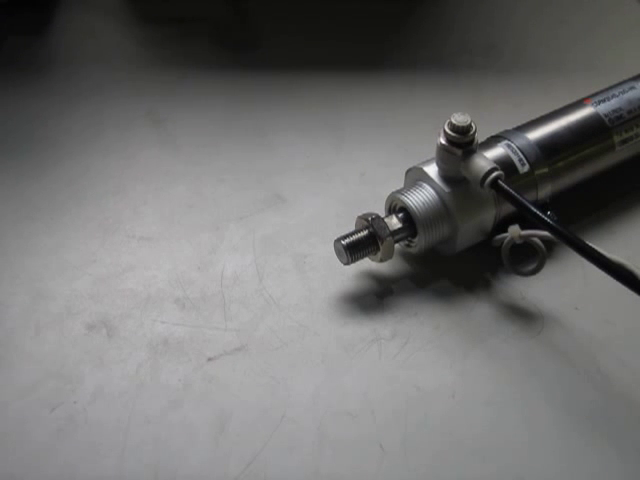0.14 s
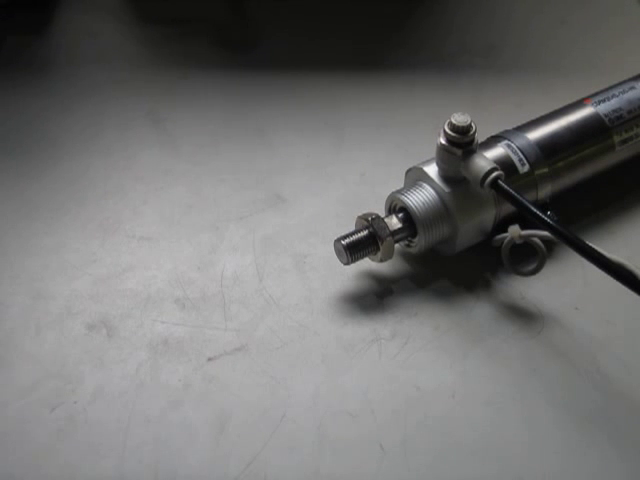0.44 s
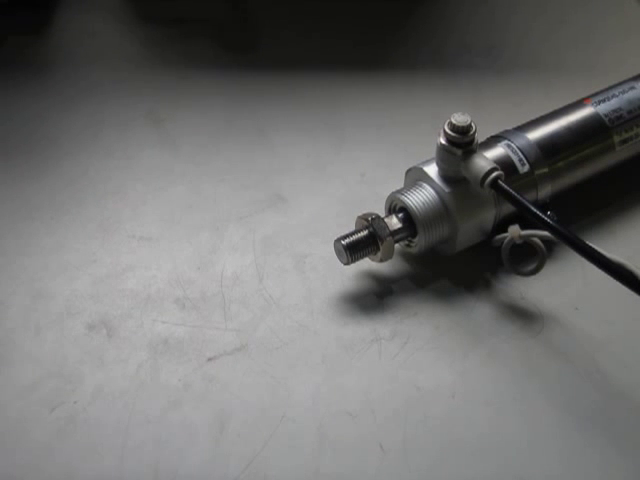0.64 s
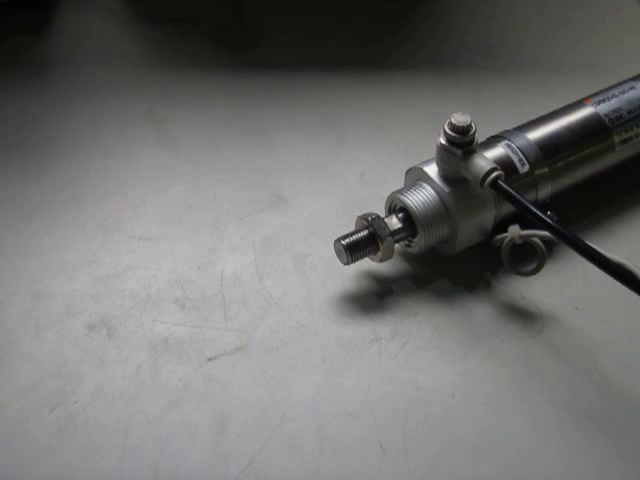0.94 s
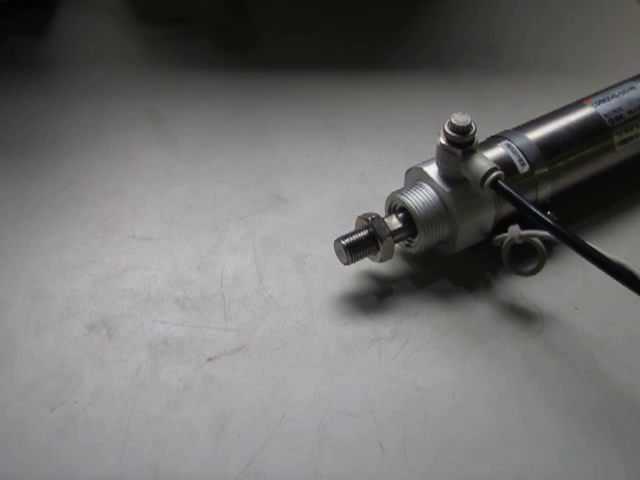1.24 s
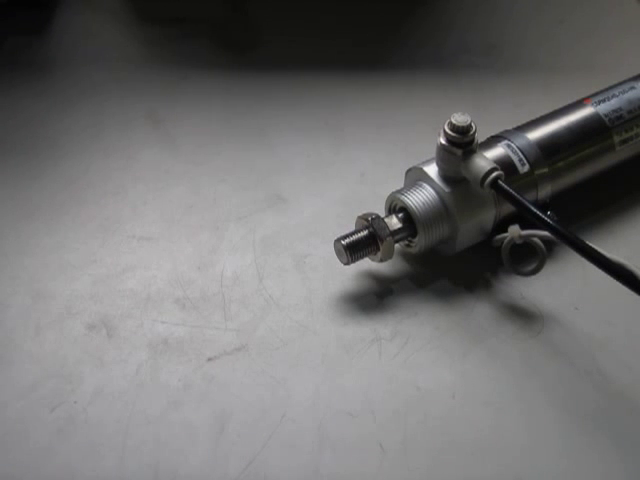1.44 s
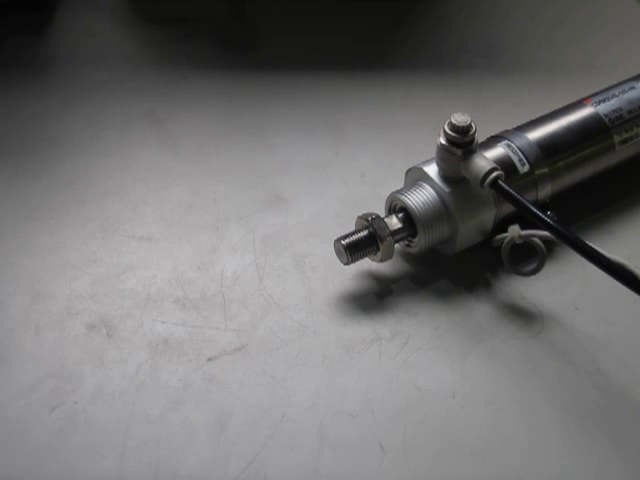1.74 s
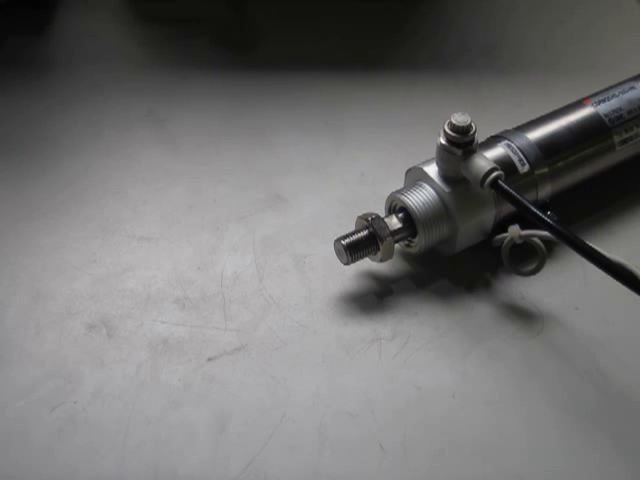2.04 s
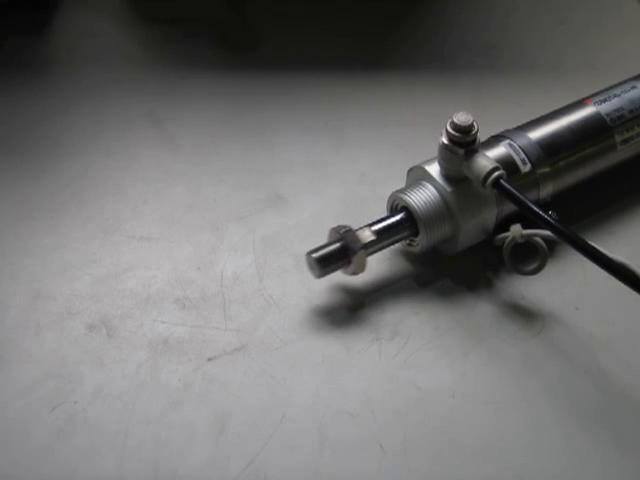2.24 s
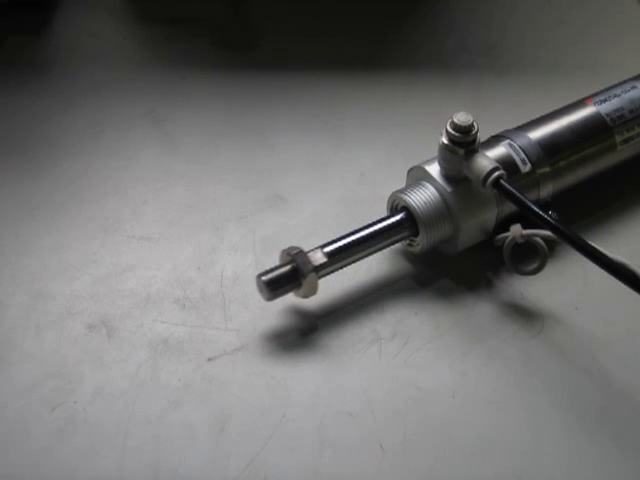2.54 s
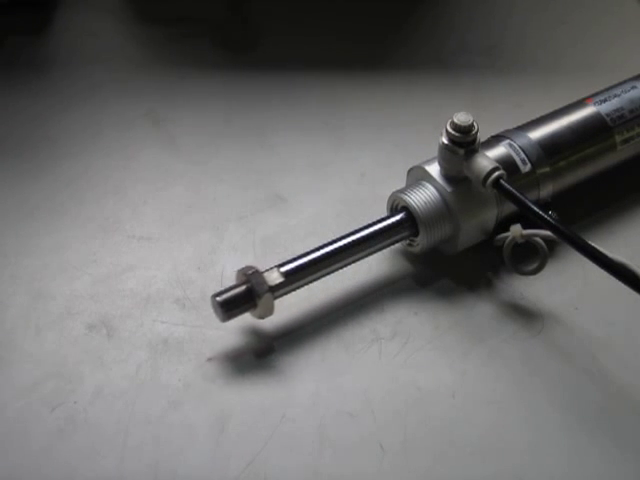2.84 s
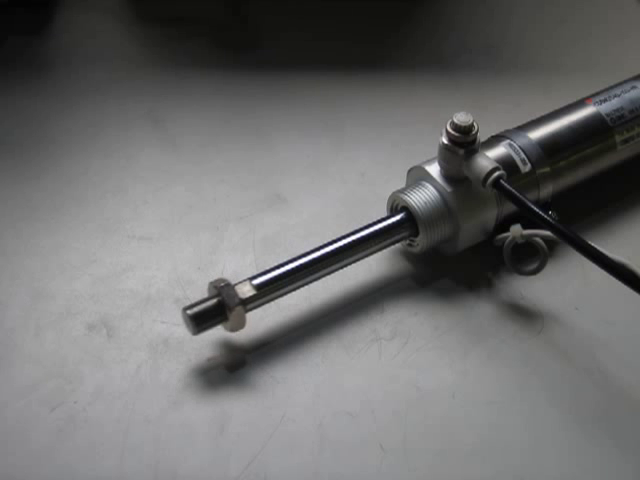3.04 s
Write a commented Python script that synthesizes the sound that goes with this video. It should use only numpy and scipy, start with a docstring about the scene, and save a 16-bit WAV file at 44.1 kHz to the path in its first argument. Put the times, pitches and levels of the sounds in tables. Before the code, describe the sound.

Pneumatic valve clicks and vents two sharp air puffs, then cylinder hiss over steady machine whir

```python
"""A steady machine whir over low hum, then a pneumatic cylinder on a bench goes to work.
The solenoid knocks and buzzes; the valve clicks over and vents in two sharp puffs.
The piston breaks loose with a low judder, and air hisses louder as the rod slides out.
Air and whir are noise shaped by broad colours and narrow resonances; hum and buzz rest on a sine,
and struck metal is a set of damped sines."""
import sys
import numpy as np
from scipy import signal
from scipy.fft import rfft, irfft, next_fast_len
from scipy.io import wavfile
from scipy.ndimage import map_coordinates

SR = 44100
rng = np.random.default_rng(int(sys.argv[2]) if len(sys.argv) > 2 else 0)


def log_audio(samples):
    """Write samples as a 16-bit WAV file to the path given in sys.argv[1]."""
    # one column per channel
    frames = np.atleast_2d(samples).T
    # limit to full scale, then quantise
    limited = np.clip(frames, -1, 1)
    pcm = np.round(limited * 32767).astype(np.int16)
    wavfile.write(sys.argv[1], SR, pcm)


N = 140238

# Vented puffs: [t/s, attack/s, hold/s, t60/s, rush level/dB, whistle level/dB, chuff level/dB, cavity level/dB]
PUFFS = [(2.190, 0.0088, 0.0017, 0.052, -20, -23.5, -31.5, -36),
         (2.2213, 0.0064, 0.018, .06, -26.5, -28, -43, -36)]
# Broad colour of the rushing air: [f/Hz, level/dB]
PUFF_COLOUR = [(700, -35), (1300, -13), (1900, -0.5), (2600, 4), (3300, -1), (4100, -7), (4700, -5),
               (5200, -3.5), (6500, -4), (7700, -7), (10800, -19), (12400, -19), (14000, -29), (16500, -45)]
# Resonances of the exhaust port: [f/Hz, width/Hz, level/dB]
PORT_PEAKS = [(1800, 230, -8), (2780, 150, -2), (3560, 210, 0), (4150, 200, 1.5), (4700, 370, 0.5),
              (5900, 300, -9), (6440, 340, 0)]
# Hollow ring of the cavity behind the port: [f/Hz, width/Hz, level/dB]
CAVITY_PEAKS = [(2150, 240, -2), (2465, 130, 7), (2710, 110, -9)]
# High whistle in the escaping air: [f/Hz, width/Hz, level/dB]
WHISTLE_PEAKS = [(9250, 590, 0.5), (9800, 260, -6), (11580, 680, -7.5)]
# Low chuff under each puff: [f/Hz, width/Hz, level/dB]
CHUFF_PEAKS = [(105, 30, -8), (352, 120, -2), (650, 64, 6), (930, 800, -10.5)]
PORT_DB = -4.5  # against the rush
CAVITY_T60_S, CHUFF_T60_S = 0.16, 0.12
FLUTTER_DB = 2  # whistle flutter
CHIRP_S, CHIRP_HZ, CHIRP_WIDTH_HZ, CHIRP_DB, CHIRP_T60_S = 2.1903, 4600, 650, -29, 0.014
# bright spit at the height of the first puff
SPIT_S, SPIT_HZ, SPIT_WIDTH_HZ, SPIT_DB = 2.2, 11600, 3200, -33

# Jolts of the piston: [t/s, level/dB]
JOLTS = [(2.365, -33.5), (2.4173, -35.5)]
# Damped modes of the bench: [f/Hz, level/dB, t60/s]
BENCH_MODES = [(144.4, -0.5, 0.38), (191, -2.5, 0.2), (266, -10, 0.2), (347, -11.5, 0.13), (500, -11, .13)]
# Broad colour of the judder: [f/Hz, level/dB]
JUDDER_COLOUR = [(30, -16), (90, -9), (145, -7), (190, 1), (280, -3), (500, -4), (800, -23), (2000, -26),
                 (4700, -16), (8000, -30), (16000, -70)]
# Hiss of the stroke through the throttle: [t/s, level/dB]
FLOW_LEVEL = [(2.3, -72), (2.6, -54), (2.8, -49), (3.0, -46), (3.17, -46.5)]
# Resonances of the throttle: [f/Hz, width/Hz, level/dB]
THROTTLE_PEAKS = [(1900, 900, -7), (2830, 800, -0.5), (4800, 700, -10), (6500, 1100, -6.5), (9240, 540, 3),
                  (10600, 1100, -7.5), (12500, 800, -4), (13600, 900, -11)]
# Broad colour of the constant leak: [f/Hz, level/dB]
LEAK_COLOUR = [(500, -32), (3000, -19), (7000, -5), (10500, -1), (12500, -6), (16000, -5), (17000, -28)]
JUDDER_S, JUDDER_ATTACK_S, JUDDER_HOLD_S, JUDDER_T60_S, JUDDER_DB = 2.364, 0.002, 0.035, 0.4, -43
LEAK_S, LEAK_DB = 2.125, -53.5
AIR_RIPPLE_DB = 1.2

# Valve clicks: [t/s, level/dB, crack level/dB]
CLICKS = [(2.1205, -30, -28.5), (2.127, -37, -28)]
# Short snaps of the spool: [t/s, level/dB]
SNAPS = [(2.1985, -19), (2.2, -18), (2.202, -23), (2.2605, -29)]
# Broad colour of clicks and snaps: [f/Hz, level/dB]
CLICK_COLOUR = [(100, -18), (400, -21), (1000, -9), (2300, 0.5), (3100, -3.5), (4000, -5), (6500, -8),
                (9300, -13), (10400, -8), (12300, -21), (13800, -14), (16500, -30)]
# Damped modes of the valve body: [f/Hz, level/dB, t60/s]
VALVE_MODES = [(1598, 1.5, .09), (2470, -11, .08), (4000, -17, .09), (5350, -10, .07), (6438, -16, 0.087),
               (10050, -13, .06), (10330, -12, .07)]
CLICK_T60_S, CRACK_T60_S, SNAP_T60_S = 0.08, 0.0099, 0.0041
RING_DB = -4  # body ring against its click
SEAT_S, SEAT_HZ, SEAT_DB, SEAT_T60_S = 2.2602, 2200, -23, 0.017

# Solenoid knocks: [t/s, level/dB]
KNOCKS = [(2.091, -37), (2.196, -35.5), (2.222, -37)]
# Damped modes of the solenoid's mount: [f/Hz, level/dB, t60/s]
MOUNT_MODES = [(110, -3, 0.18), (210, -3, 0.051)]
COIL_S, COIL_ATTACK_S, COIL_HOLD_S, COIL_T60_S = 2.105, 0.006, 0.03, 0.2
COIL_DB, COIL_RATTLE_DB = -37.5, -47
THUMP_S, THUMP_DB = 2.082, -49

# Narrow resonances of the drone: [f/Hz, width/Hz, level/dB]
DRONE_PEAKS = [(398, 48, -16.5), (530.3, 43.5, -15.5), (636.4, 28.4, -13.5), (768.4, 44.6, -9.5),
               (789, 49, -7.5), (867, 32, -7), (938.2, 24, -1), (978, 73, -7), (1039, 53, -7),
               (1170, 73, -20), (1377, 33, -14.5), (1431, 46, -15.5)]
# Slow drift of the drone: [t/s, level/dB]
DRONE_DRIFT = [(0, .5), (.9, 1.2), (1.5, 0), (2.0, 0.5), (2.55, -1), (2.901, 0.5), (3.18, 2)]
# Wavering hum: [t/s, level/dB]
HUM_LEVEL = [(0, -59.5), (.6, -52.5), (1.4, -52.5), (1.55, -56), (2.05, -59), (2.6, -52), (3.18, -52.5)]
# Broad colour of the noise bed: [f/Hz, level/dB]
BED_COLOUR = [(15, -16), (35, 6), (60, -3.5), (100, -3.5), (170, -1), (280, -3), (700, -11.5), (1200, 0.5),
              (1400, -4.5), (1550, -19), (3000, -63)]
# Broad colour of the treble hiss: [f/Hz, level/dB]
TREBLE_COLOUR = [(900, -19), (1500, -1.5), (2000, 0), (3000, -4.5), (4000, -10), (4700, -10.5),
                 (5600, -8.5), (6400, -11), (8100, -10), (10500, -14.5), (12200, -22), (14200, -25.5),
                 (16500, -35)]
# Narrow resonances in the hiss: [f/Hz, width/Hz, level/dB]
HISS_PEAKS = [(1912, 200, -1), (2250, 71, 0.5), (2760, 160, -6.5), (3210, 50, 1.5), (3535, 27, -0.5),
              (3770, 29, 0.5), (3967, 113, -4), (4535, 130, -8), (5220, 95, -8.5), (5550, 100, -10.5),
              (5734, 135, -5), (6980, 250, -12.5), (7740, 250, -5.5), (8110, 100, -4), (8530, 120, -6.5),
              (8900, 110, -8), (9080, 70, -7)]
HUM_HZ = 120  # also the pitch of the solenoid buzz
DRONE_DB, BED_DB, TREBLE_DB, HISS_PEAKS_DB = -37.5, -48.5, -44.5, -48
WHIR_RIPPLE_DB = 3
RIPPLE_HZ = 60.77  # spacing of the ripple knots

# Decay of the room: [f/Hz, t60/s]
ROOM_DECAY = [(200, 0.37), (2000, 0.15), (6000, 0.22), (14000, 0.034)]
ROOM_DB = -10.5
TOP_HZ = 16400


def exhaust():
    """The seal opens with a chirp; puffs rush through the port with whistle, chuff and hollow ring."""
    spit = envelope(SPIT_S, 0.0008, 0.0024, 0.011) * resonant([(SPIT_HZ, SPIT_WIDTH_HZ, 0)])
    chirp = envelope(CHIRP_S, 0.0034, 0.002, CHIRP_T60_S) * resonant([(CHIRP_HZ, CHIRP_WIDTH_HZ, 0)])
    out = amp(SPIT_DB) * spit + amp(CHIRP_DB) * chirp
    for s, attack, hold, t60, rush_db, whistle_db, chuff_db, cavity_db in PUFFS:
        air = amp(rush_db) * unit(rush(PUFF_COLOUR) + amp(PORT_DB) * resonant(PORT_PEAKS))
        whistle = amp(whistle_db + FLUTTER_DB * wobble(220)) * resonant(WHISTLE_PEAKS)
        pressure = envelope(s, attack, hold, t60)
        # squared: the whistle fades sooner than the rush
        out += pressure * air + pressure ** 2 * whistle
        out += amp(chuff_db) * envelope(s, attack, hold, CHUFF_T60_S) * resonant(CHUFF_PEAKS)
        out += amp(cavity_db) * envelope(s, attack, hold, CAVITY_T60_S) * resonant(CAVITY_PEAKS)
    return out


def cylinder():
    """The piston breaks loose in jolts that ring the bench; the throttle's hiss swells with the stroke."""
    judder_env = envelope(JUDDER_S, JUDDER_ATTACK_S, JUDDER_HOLD_S, JUDDER_T60_S)
    judder = amp(JUDDER_DB) * judder_env * rush(JUDDER_COLOUR)
    jolts = sum(amp(db) * ringing(BENCH_MODES, s) for s, db in JOLTS)
    flow_db = over_time(FLOW_LEVEL) + 0.6 * wobble(28)
    leak = amp(LEAK_DB) * rush(LEAK_COLOUR)
    flow = amp(flow_db) * rippled(resonant(THROTTLE_PEAKS), AIR_RIPPLE_DB)
    return judder + jolts + (leak + flow) * (clock() > LEAK_S)


def valve():
    """The armature strikes and bounces, ringing the body; the spool snaps across and seats with a tick."""
    seat_modes = [(SEAT_HZ, 0, SEAT_T60_S), (2600, -11, 0.04), (1400, -8, 0.012)]
    out = amp(SEAT_DB) * ringing(seat_modes, SEAT_S)
    for s, db, crack_db in CLICKS:
        click = amp(db) * envelope(s, 0.00032, 0, CLICK_T60_S)
        crack = amp(crack_db) * envelope(s, 0.00019, 0.00069, CRACK_T60_S)
        out += amp(db + RING_DB) * ringing(VALVE_MODES, s)
        out += (click + crack) * rush(CLICK_COLOUR)
    for s, db in SNAPS:
        out += amp(db) * envelope(s, 0.00024, 0.0002, SNAP_T60_S) * rush(CLICK_COLOUR)
    return out


def solenoid():
    """The coil knocks and buzzes at the hum's pitch as it pulls in, shaking the bench."""
    buzz = amp(COIL_DB) * tone(HUM_HZ) + amp(COIL_RATTLE_DB) * resonant([(220, 310, 0)])
    buzz_env = envelope(COIL_S, COIL_ATTACK_S, COIL_HOLD_S, COIL_T60_S)
    shudder_env = envelope(THUMP_S, 0.006, 0.18, 0.22)
    shudder = amp(THUMP_DB) * shudder_env * resonant([(75, 73, 2), (250, 120, -14)])
    knocks = sum(amp(db) * ringing(MOUNT_MODES, s) for s, db in KNOCKS)
    return buzz_env * buzz + shudder + knocks


def whir():
    """Steady machinery: a resonant drone, a noise bed, hollow hiss and mains hum."""
    drone_db = DRONE_DB + over_time(DRONE_DRIFT) + 0.49 * wobble(12) + 0.91 * wobble(70)
    drone = amp(drone_db) * resonant(DRONE_PEAKS)
    hum = amp(over_time(HUM_LEVEL)) * tone(HUM_HZ)
    bed = amp(BED_DB) * rush(BED_COLOUR)
    hiss = amp(TREBLE_DB) * rippled(rush(TREBLE_COLOUR), WHIR_RIPPLE_DB)
    hiss += amp(HISS_PEAKS_DB) * resonant(HISS_PEAKS)
    return drone + hum + bed + amp(0.16 * wobble(8.0)) * hiss


def room(x):
    """A small room's tail: noise whose bands die at their own rates, the highest treble first."""
    hz, t, z = signal.stft(rng.standard_normal(SR // 2), SR, nperseg=256)
    decay = np.exp(-np.log(1000) * t / along(ROOM_DECAY, hz)[:, None])
    tail = signal.istft(z * decay, SR, nperseg=256)[1]
    return signal.fftconvolve(x, tail / np.linalg.norm(tail))[:N]


def rippled(x, depth_db):
    """Dense fixed peaks and dips from nearby surfaces; rms 1."""
    knots = rng.standard_normal(2048)

    def ripple(hz):
        return amp(depth_db * map_coordinates(knots, [hz / RIPPLE_HZ], mode="mirror"))

    return unit(filtered(x, ripple))


def ringing(modes, start):
    """Damped modes set off together by one blow."""
    t = np.maximum(clock() - start, 0)
    sines = sum(amp(db - 60 * t / t60) * np.sin(2 * np.pi * hz * t) for hz, db, t60 in modes)
    return np.sqrt(2) * sines


def rush(colour):
    """Noise of rms 1 with a broad colour."""
    return unit(filtered(rng.standard_normal(N), lambda hz: amp(along(colour, hz))))


def resonant(peaks):
    """Noise of rms 1 in steep-sided resonances, each 6 dB down at 0.6 widths either side."""
    def gain(hz):
        power = sum(amp(2 * db) / (1 + ((hz - c) / (0.6 * w)) ** 2) ** 2 for c, w, db in peaks)
        return np.sqrt(power)

    return unit(filtered(rng.standard_normal(N), gain))


def tone(hz):
    """A sine of rms 1 at a random phase."""
    return np.sqrt(2) * np.sin(2 * np.pi * (hz * clock() + rng.random()))


def envelope(start, attack, hold, t60):
    """Linear rise, hold, exponential fall by 60 dB in t60 seconds."""
    t = clock() - start
    fall = np.exp(-np.log(1000) * np.maximum(t - attack - hold, 0) / t60)
    return np.clip(t / attack, 0, 1) * fall


def wobble(rate):
    """A smooth random curve, rate knots a second."""
    return map_coordinates(rng.standard_normal(int(N * rate / SR) + 4), [clock() * rate])


def over_time(points):
    """(t/s, value) points joined by straight lines."""
    return np.interp(clock(), *np.transpose(points))


def along(points, hz):
    """(f/Hz, value) points on a log frequency axis."""
    f, v = np.transpose(points)
    return np.interp(np.log(hz + 1), np.log(f + 1), v)


def filtered(x, response):
    """x times a response of frequency."""
    m = next_fast_len(N + 8192)
    return irfft(rfft(x, m) * response(np.fft.rfftfreq(m, 1 / SR)), m)[:N]


def amp(db):
    """Decibels to gain."""
    return 10 ** (np.asarray(db) / 20)


def unit(x):
    """Scale to rms 1."""
    return x / np.sqrt(np.mean(x ** 2) + 1e-20)


def clock():
    """Time of each sample in seconds."""
    return np.arange(N) / SR


def scene():
    """Valve and cylinder in the humming room; the valve and its puffs get the room's tail."""
    switching = valve() + exhaust()
    wet = amp(ROOM_DB) * room(switching)
    return (switching + wet + solenoid() + cylinder() + whir())[None]


def record(dry):
    """Nothing is kept above the band limit."""
    return filtered(dry[0], lambda hz: hz < TOP_HZ)[None]


dry = scene()
out = record(dry)
log_audio(out)
```